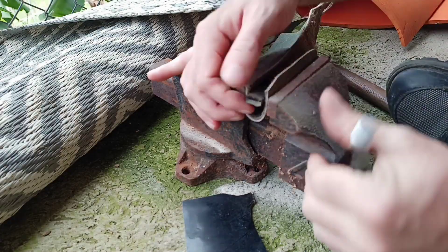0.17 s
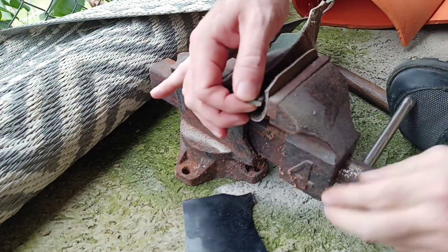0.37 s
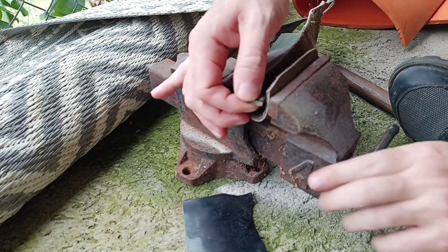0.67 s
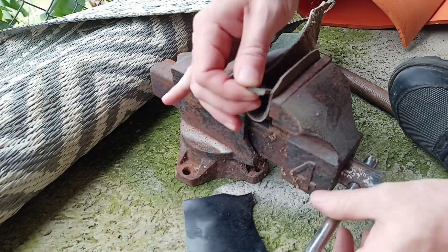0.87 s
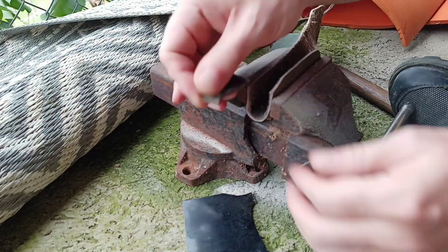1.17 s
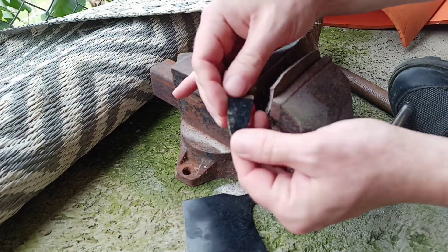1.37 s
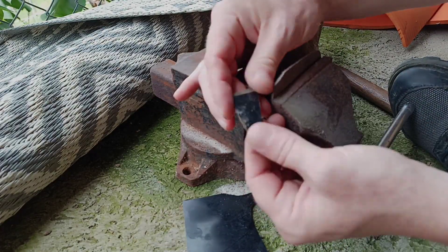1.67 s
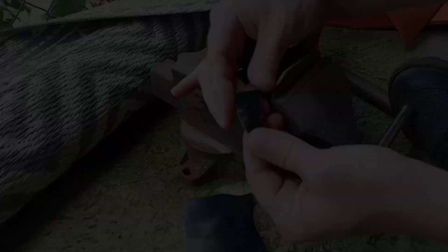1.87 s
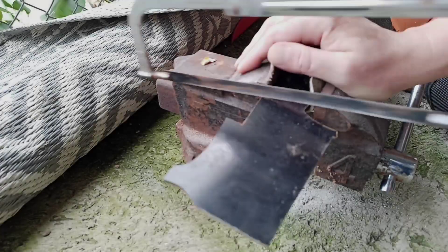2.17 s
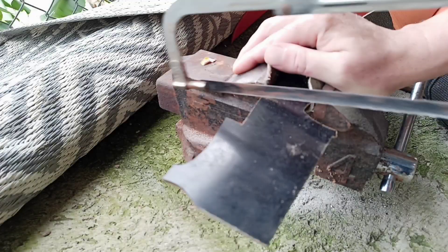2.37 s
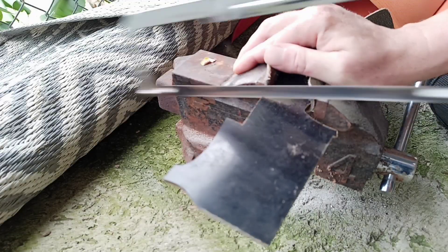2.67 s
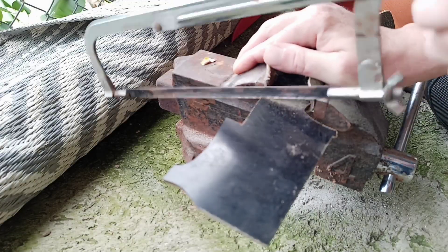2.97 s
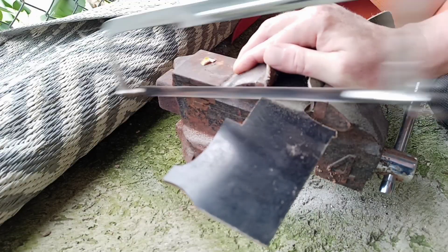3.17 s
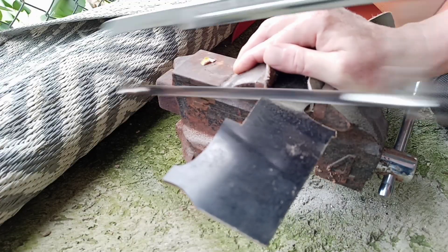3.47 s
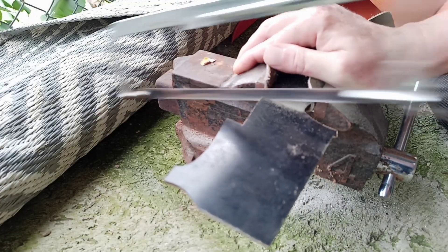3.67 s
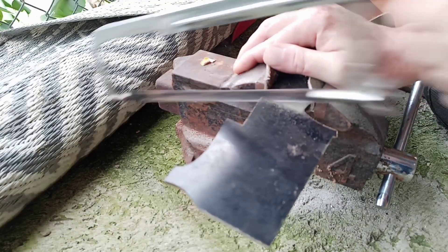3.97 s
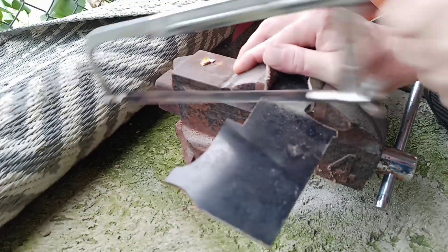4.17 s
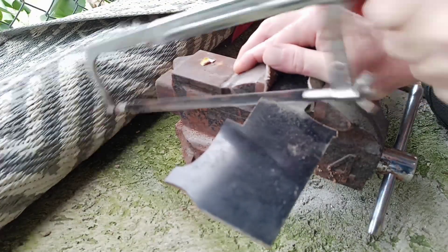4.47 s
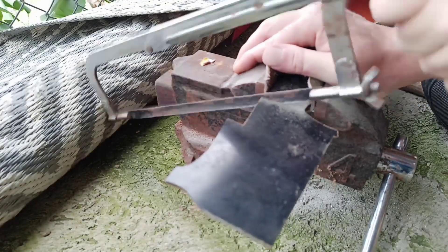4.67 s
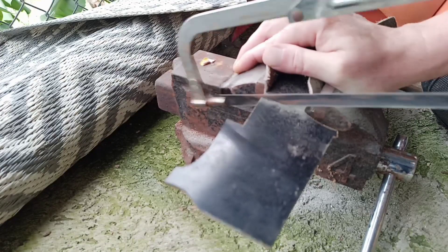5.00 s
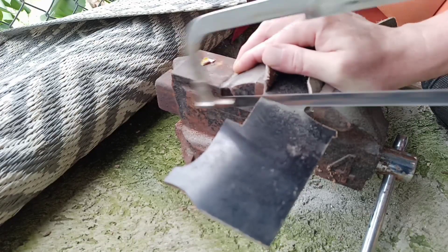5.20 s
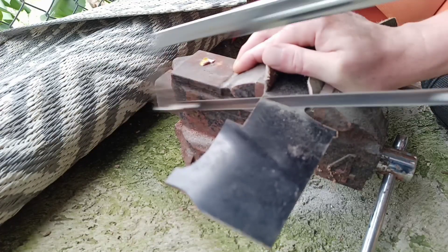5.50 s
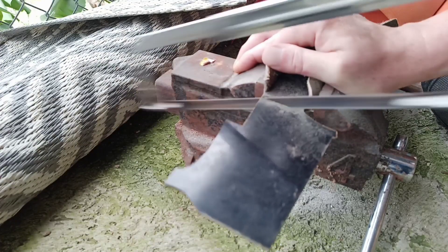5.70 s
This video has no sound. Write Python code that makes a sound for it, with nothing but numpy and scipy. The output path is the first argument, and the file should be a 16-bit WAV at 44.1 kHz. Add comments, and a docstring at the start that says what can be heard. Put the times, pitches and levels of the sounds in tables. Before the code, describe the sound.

First, sparse metal handling near the microphone: a sliding vise rod clicks, scrapes and knocks, loudest just after half a second, with a last softer clack at one second. Quiet outdoor air dips away. Then speeded-up hacksawing swells in and stays loud, a buzzing, gritty metallic rasp with fluttering strokes, fitful singing squeals and small vise thuds. Dry, no echo, single channel.

```python
"""Outdoors, close to a vise, over a faint low drone and quiet air: a hand spins and sets its sliding handle,
heard as bursts of coloured noise, ringing modes and low thuds; all that fades away.
Then a hacksaw fades in, racing through a clamped steel plate at about twenty strokes a second:
noisy tooth force rings the steel, gliding tones chirp when the teeth catch,
and short low pulses are the vise thumping where the saw turns round."""
import sys
import numpy as np
from scipy.fft import rfft, irfft, next_fast_len
from scipy.io import wavfile
from scipy.ndimage import uniform_filter1d, map_coordinates

SR = 44100
rng = np.random.default_rng(int(sys.argv[2]) if len(sys.argv) > 2 else 0)


def unload_audio(sound):
    """Save the sound as a 16-bit wav file, at the path given as the first command line argument."""
    columns = np.transpose(np.atleast_2d(sound))
    # keep every value between -1 and 1, then stretch to whole-number steps
    steps = np.round(np.clip(columns, -1, 1) * 32767)
    wavfile.write(sys.argv[1], SR, steps.astype(np.int16))


N = 257544
TIME = np.arange(N) / SR


def amp(db):
    """Decibels to gain."""
    return 10 ** (np.asarray(db) / 20)


def unit(x):
    """Scales a sound to rms 1."""
    return x / np.sqrt(np.mean(x ** 2) + 1e-20)


def over_time(points):
    """Reads (time, value) points along the whole take."""
    return np.interp(TIME, *np.transpose(points))


def along(points, hz):
    """Reads (Hz, value) points on a log frequency axis."""
    f, v = np.transpose(points)
    return np.interp(np.log(hz + 1), np.log(f + 1), v)


def wobble(rate):
    """A smooth random curve with this many knots a second."""
    knots = rng.standard_normal(int(N * rate / SR) + 4)
    return map_coordinates(knots, [TIME * rate])


def filtered(x, response):
    """Multiplies the spectrum of x by a response of frequency."""
    size = next_fast_len(len(x) + 4096)
    hz = np.fft.rfftfreq(size, 1 / SR)
    return irfft(rfft(x, size) * response(hz), size)[:len(x)]


def noise(response, size=N):
    """Coloured noise of rms 1."""
    return unit(filtered(rng.standard_normal(size), response))


def resonances(modes, hz):
    """Gain of a set of (Hz, half width Hz, dB) resonances with steep skirts."""
    power = 0
    for centre, width, db in modes:
        power = power + (amp(db) / (1 + ((hz - centre) / width) ** 2)) ** 2
    return np.sqrt(power)


def add(track, s, sound):
    """Mixes a sound into the track, centred on time s."""
    index = round(s * SR) - len(sound) // 2 + np.arange(len(sound))
    inside = (index >= 0) & (index < N)
    track[index[inside]] += sound[inside]


def around(size):
    """A short time axis in seconds, centred on zero."""
    return (np.arange(size) - size // 2) / SR


def thud(t, hz, length):
    """A few cycles of the heavy vise rocking, under a bell-shaped swell."""
    swell = np.exp(-.5 * (t / length) ** 2)
    return np.sqrt(2) * swell * np.sin(2 * np.pi * (hz * t + rng.random()))


# the wavering low drone: start_s, pitch_hz, level_db
DRONE_PATH = [(0, 77.3, -54), (.11, 77.4, -55), (.25, 67.2, -76), (.45, 68, -66), (.62, 65, -54),
              (.75, 54.7, -56), (.82, 54.6, -70), (1.13, 56, -65.5), (1.24, 56.8, -47.5),
              (1.38, 56.7, -55.5), (1.5, 56.2, -72.5), (1.9, 57.7, -101)]
# colour of the open air: freq_hz, level_db (relative)
AIR_COLOUR = [(25, -26.5), (70, -6.5), (130, -9.5), (205, -11), (260, -19), (420, -25), (1100, -31.5),
              (3000, -33), (6500, -36), (7800, -43.5), (9500, -42), (13000, -50)]
# loudness of the air at the microphone: start_s, level_db
AIR_LEVEL = [(0, -68), (1.4, -64), (1.65, -70.5), (1.85, -80), (1.95, -102), (2.05, -75.5), (2.4, -71)]


def outdoors():
    """The place itself: shaped noise for quiet air, and a sine of changing pitch and level for the drone."""
    s, hz, db = np.transpose(DRONE_PATH)
    phase = 2 * np.pi * np.cumsum(np.interp(TIME, s, hz)) / SR
    drone = np.sqrt(2) * amp(np.interp(TIME, s, db)) * np.sin(phase)
    air = noise(lambda hz: amp(along(AIR_COLOUR, hz)))
    return drone + air * amp(over_time(AIR_LEVEL))


# resonances of the vise body: pitch_hz, half_width_hz, level_db (relative)
VISE_MODES = [(1133, 15, -1), (1473, 48, -0.5), (1970, 56, -7.5), (2600, 49, -2), (3010, 70, -5),
              (3500, 25, -12.5), (3970, 120, -15.5), (4720, 55, -8.5), (6270, 55, -7.5), (6960, 74, -14.5)]


def clank(t, t60):
    """The vise's modes ring on after a contact, at new strengths each time, falling 60 dB in t60 seconds."""
    age = np.maximum(t, 0)
    ring = np.zeros(len(t))
    for hz, _, db in VISE_MODES:
        strength = amp(db + rng.normal(0, 3))
        ring += strength * np.sin(2 * np.pi * (hz * age + rng.random()))
    onset = 1 - np.exp(-age / .001)
    return ring * onset * amp(-60 * age / t60)


# the handle slides and hits its stops:
# centre_s, level_db (before trims), rise_s, fall_s, brightness_db per octave, rod_ring_db, thud_db
HANDLE_MOVES = [(0.0644, -40, 0.0014, 0.0031, -3.5, -80, -62), (0.327, -53.5, 0.0096, 0.029, -12, -59, -80),
                (.348, -34, 0.0083, 0.013, 1, -39.5, -55), (.441, -48, 0.0077, 0.013, 1, -72, -56),
                (0.584, -53.5, 0.011, 0.035, -3, -82, -73.5), (.602, -23.5, 0.0027, 0.0084, -1, -47.5, -52),
                (0.614, -30.5, 0.0017, 0.0063, -0.5, -47, -35), (.669, -56, .002, 0.0034, -3, -54, -85),
                (.695, -59, 0.012, 0.017, 3.5, -75, -72), (1.004, -59, 0.0083, 0.024, -9.5, -82.5, -77),
                (1.05, -50.5, 0.0072, 0.018, -12, -54, -60), (1.071, -42, 0.014, 0.012, 3, -46, -44.5)]
# broad colour of a scrape on the vise: freq_hz, level_db (relative)
VISE_COLOUR = [(130, -19), (310, -20.5), (450, -11), (800, -6), (1100, -0.5), (1900, -6.5), (3300, -10.5),
               (5000, -7.5), (7200, -9.5), (8100, -19), (9800, -10), (11000, -26.5), (15000, -30)]
# the handle rod's own ring: pitch_hz, half_width_hz, level_db (relative)
ROD_MODES = [(5140, 100, 6.5), (9960, 150, -6.5)]


def handle():
    """The rod scrapes through the spindle and knocks at its end, ringing itself and the vise."""
    track, t = np.zeros(N), around(size=8192)
    for s, db, rise, fall, tilt_db, ring_db, thud_db in HANDLE_MOVES:
        swell = np.exp(-np.abs(np.where(t < 0, t / rise, t / fall)) ** 1.52)

        def colour(hz):
            octaves = np.log2(np.clip(hz, 500, 9000) / 3000)
            broad = amp(along(VISE_COLOUR, hz) + tilt_db * octaves)
            return broad * (1 + amp(7.5) * resonances(VISE_MODES, hz))

        scrape = amp(db - 0.5) * swell * noise(colour, size=len(t))
        rod_ring = amp(ring_db) * swell * noise(lambda hz: resonances(ROD_MODES, hz), size=len(t))
        knock = amp(db - 13) * clank(t + rise / 2, t60=.012 + 5 * fall)
        low_thud = amp(thud_db) * thud(t, hz=135, length=0.0072)
        add(track, s, scrape + rod_ring + knock + low_thud)
    squeak = amp(-61) * np.exp(-(t / 0.0046) ** 2) * np.sin(2 * np.pi * 6520 * t)
    add(track, .157, squeak)  # one tiny squeak
    return track


# runs of evenly spaced strokes, push and pull in turn: start_s, strokes (count), first_turn_dip_db,
# later_turn_dip_db, plate_db (relative to the effort, before push/pull and scatter)
STROKE_RUNS = [(2.006, 1, -20, -19, 6.5), (2.072, 1, -49, -45, -5.5), (2.155, 3, -48, -12.5, -7),
               (2.319, 1, -27, -24, -11), (2.368, 4, -19.5, -5.5, -10.5), (2.576, 1, -28, -28, -19.5),
               (2.645, 3, -22, -6.5, -13.5), (2.805, 1, -16, -20, -10.5), (2.854, 3, -22.5, -7.5, -16.5),
               (3.018, 4, -19.5, -5.5, -17), (3.222, 4, -20, -13, -18.5), (3.431, 4, -9, -13.5, -17),
               (3.625, 5, -9, -6, -13), (3.875, 7, -22, -5.5, -17), (4.222, 3, -16.5, -14, -18.5),
               (4.366, 3, -15.5, -6, -16), (4.517, 4, -3.5, -7, -13), (4.71, 3, -17, -18.5, -23),
               (4.854, 4, -20.5, -8, -20), (5.039, 4, -14.5, -7, -20.5), (5.247, 3, -26, -15, -20.5),
               (5.387, 4, -10, -8, -19.5), (5.577, 3, -5, -3, -16.5), (5.73, 2, -15.5, -4, -22.5),
               (5.826, 1, -24, -21, -33)]
LAST_STROKE_S = .05


def turns():
    """Every turn of the saw: its time, the rasp's dip there and the plate's level in the stroke that follows."""
    ends = [run[0] for run in STROKE_RUNS[1:]] + [STROKE_RUNS[-1][0] + LAST_STROKE_S]
    rows = []
    for (start, strokes, first_db, later_db, plate_db), end in zip(STROKE_RUNS, ends):
        for k, s in enumerate(np.linspace(start, end, strokes, endpoint=False)):
            rows.append((s, later_db if k else first_db, plate_db))
    rows.append((end, later_db, plate_db))
    return np.transpose(rows)


# how hard the saw is driven, the reference for rasp, plate, jolts and lesser chirps: start_s, level_db
EFFORT = [(2.02, -60), (2.12, -46), (2.22, -41.5), (2.35, -27), (2.6, -22), (3.6, -21.5), (4.5, -21.5),
          (4.8, -21), (5.3, -20), (5.84, -21)]
PUSH_DB, PULL_PLATE_DB = 0.36, 2.5  # the teeth cut on the push; the plate rings more on the pull
RASP_SCATTER_DB, PLATE_SCATTER_DB = .5, 2.47  # from stroke to stroke
PUSH_CREST, PULL_CREST = .45, .47  # moment of full speed, as a share of the stroke


def stroke_motion(peakedness=2.1, usual_s=0.056):
    """Saw speed (0-1), rasp amplitude and plate level: each stroke speeds up and stops again."""
    start, dip_db, plate_db = turns()
    place = np.interp(TIME, start, np.arange(len(start)))
    k = np.minimum(place.astype(int), len(start) - 2)  # which stroke
    u = place % 1  # share of the stroke done
    push = np.where(k % 2, -1, 1)
    crest = np.where(push > 0, PUSH_CREST, PULL_CREST)
    speed = np.abs(np.sin(np.pi / 2 * np.where(u < crest, u / crest, (1 - u) / (1 - crest))))
    # long strokes hold their force
    bite = speed ** (peakedness * np.minimum(1, usual_s / np.diff(start)[k]) ** 2)
    bite = np.tanh(1.024 * bite) / np.tanh(1.15)  # the teeth can only dig in so far
    effort = amp(over_time(EFFORT)) * np.clip((TIME - start[0]) / .005, 0, 1)
    rasp_luck, plate_luck = rng.standard_normal((len(start), 2))[k].T
    at_turn = amp(np.interp(TIME, start, dip_db))
    at_speed = amp(PUSH_DB * push + RASP_SCATTER_DB * rasp_luck)
    rasp = at_turn * (1 - bite) + at_speed * bite
    plate = amp(plate_db[k] - PULL_PLATE_DB * push + PLATE_SCATTER_DB * plate_luck)
    return speed, effort * rasp, effort * uniform_filter1d(plate, size=600)


def teeth(grit_db, grit_rate, snag_db, snag_rate):
    """Force of teeth tearing off chips: a gritty rush with single harder snags."""
    rush = unit(rng.standard_normal(N) * amp(grit_db * wobble(grit_rate)))
    snags = (rng.random(N) < snag_rate / SR) * rng.standard_normal(N)
    return rush + amp(snag_db) * unit(snags)


# how far the saw has sunk in: start_s, depth (0 shallow, 1 medium, 2 deep)
CUT_DEPTH = [(2.9, 0.15), (3.7, 0.63), (4.6, 1.7), (4.8, 2.43)]


def steel(force, modes, bend, wander_db, drift):
    """The force rings the steel; modes bend in pitch and trade strength as contact moves and the cut deepens."""
    depth = over_time(CUT_DEPTH)
    shares = np.maximum(0, 1 - np.abs(depth - np.arange(3)[:, None]))  # of shallow, medium, deep
    size = next_fast_len(N + 4096)
    hz, spectrum = np.fft.rfftfreq(size, 1 / SR), rfft(force, size)
    sound, power = np.zeros(N), np.zeros(N)
    for centre, width, *db in modes:
        delay = rng.random() * 0.001194  # each mode is reached by its own path
        response = np.exp(-2j * np.pi * hz * delay) / (1 + 1j * (hz - centre) / width) ** 2
        analytic = np.fft.ifft(spectrum * response, size)[:N]  # one-sided, so its pitch can be shifted
        shift_hz = min(centre, 4000) * (bend + drift * wobble(40))
        ring = np.real(analytic * np.exp(2j * np.pi * np.cumsum(shift_hz) / SR))
        gain = amp(db) @ shares
        sound += gain * amp(wander_db * wobble(45)) * unit(ring) * np.sqrt(width)
        power += gain ** 2 * width
    return sound / np.sqrt(power)


# the blade's singing pitch in a shallow, medium and deep cut: pitch_hz
WHISTLE_PITCH = [3416, 3570, 3563]


def whistle(speed, arch=.1, unsteady=.033, fitful_db=8.0, overtone_db=-6):
    """The blade sings fitfully while it runs fast; its pitch arches with the speed of each stroke."""
    hz = np.interp(over_time(CUT_DEPTH), np.arange(3), WHISTLE_PITCH)
    pitch = hz * (1 + arch * (speed - 1) + unsteady * wobble(28))
    phase = 2 * np.pi * np.cumsum(pitch) / SR + .17 * wobble(450)
    tone = np.sin(phase) + amp(overtone_db) * np.sin(2 * phase)
    return unit(tone * speed * amp(fitful_db * np.tanh(wobble(22))))


# resonances of plate, blade and frame: pitch_hz, half_width_hz,
# shallow_db, medium_db, deep_db (relative levels by depth of cut)
STEEL_MODES = [(355.6, 22.3, -22, -17.5, -12.5), (715, 124, -19, -18.5, -19.5), (935, 67, -1, -41, -17),
               (1097, 62.4, -6.5, 1, -3), (1461, 210, -16.5, -14.5, -15), (1807, 44, -4.5, -9, -12.5),
               (2010, 100, -4, -6.5, -9), (2318, 105, -6, -4, -9), (2820, 250, -16, -11, -6),
               (2867, 44, -10, -8.5, -4.5), (3406, 58, -1.5, -0.5, -6), (3652, 233, -17.5, -2.0, -3.5),
               (4360, 340, -12, -7, -10), (5108, 58, -5, -6, -9), (5430, 232, -7.5, -10, -4),
               (6080, 250, -7.5, -1, -11.5), (6720, 350, -22, -11, -11.5), (7380, 126, -8.5, -14, -13.5),
               (7640, 174, -7, -10.5, -13.5), (8670, 350, -15.5, -16, -20.5), (9800, 700, -17, -15, -15),
               (10800, 170, -20.5, -19, -21.5), (11300, 4500, -24.5, -26.5, -26.5),
               (15100, 1800, -22.5, -24.5, -26.5)]


def saw():
    """The bright rasp and the plate's note follow the stroke; the lowest modes judder where the saw slows."""
    speed, rasp, plate = stroke_motion()
    force = teeth(grit_db=1.5, grit_rate=900, snag_db=-13.5, snag_rate=220)
    jolts = teeth(grit_db=4.5, grit_rate=90, snag_db=-8, snag_rate=60)
    low_hz, high_hz = 850, 1600
    high_modes = [m for m in STEEL_MODES if m[0] > high_hz]
    note_modes = [m for m in STEEL_MODES if low_hz < m[0] <= high_hz]
    low_modes = [m for m in STEEL_MODES if m[0] <= low_hz]
    bend = .05 * (speed - .8)  # the teeth press harder at speed and stiffen the contact
    bright = steel(force, high_modes, bend, wander_db=3.0, drift=.014)
    note = steel(force, note_modes, bend, wander_db=3.0, drift=0.01475)
    judder = steel(jolts, low_modes, bend, wander_db=4.0, drift=0.0103)
    singing = amp(-11) * whistle(speed)

    def lately(level):  # mean over a few strokes
        return np.abs(uniform_filter1d(level, size=9000)) + 1e-9

    contact = (rasp / lately(rasp)) ** 0.65  # drops wherever the saw stops dead
    slowing = 1 - 0.86 * speed ** 2
    sound = rasp * (amp(-0.57) * bright + singing)
    sound += amp(-2.0) * plate * contact * note
    sound += amp(-5.0) * lately(plate) * contact ** 0.63 * slowing * judder
    dips = [(8170, 170, -8.0), (525, 101, -5.0)]  # antiresonances: Hz, half width Hz, cancelled part dB

    def body(hz):
        low_cut = 1 / np.sqrt(1 + (290 / (hz + 1)) ** 14)
        return (1 - resonances(dips, hz)) * low_cut

    return filtered(sound, body)


# the hardest jolts of the vise on the ground: centre_s, level_db (before a common trim)
HARD_THUMPS = [(2.244, -42.5), (2.568, -43), (2.805, -38), (2.9, -42), (3.013, -37), (3.131, -38),
               (3.426, -35.5), (3.73, -43), (4.13, -43), (4.808, -45), (5.645, -42), (5.775, -39.5)]
# ordinary jolts at each turn, relative to the effort and before the same trim
ROCK_PUSH_DB, ROCK_PULL_DB, ROCK_SCATTER_DB, ROCK_LAG_S = -28.5, -39, 2, .002


def rocking():
    """The vise thumps at each turn, most before a push, over a low unsteady shudder of filtered noise."""
    track, t = np.zeros(N), around(size=4096)
    jolts = []
    for k, s in enumerate(turns()[0]):
        effort_db = np.interp(s, *np.transpose(EFFORT))
        turn_db = ROCK_PULL_DB if k % 2 else ROCK_PUSH_DB
        jolts.append((s + ROCK_LAG_S, effort_db + turn_db + ROCK_SCATTER_DB * rng.standard_normal()))
    for s, db in HARD_THUMPS + jolts:
        hz = 142 * np.exp(0.067 * rng.standard_normal())
        add(track, s, thud(t, hz, length=0.0067) * amp(db - 3.0))
    shudder = noise(lambda hz: resonances([(129, 57, 0)], hz)) * amp(1.8 * wobble(35))
    fade_in = np.clip((TIME - 2.1) / 0.33, 0, 1)
    return track + shudder * amp(-61.5) * fade_in


def catches(blade_share=.15, plate_share=.5, blade_db=-1.0, plate_db=-11, blade_hz=2880, plate_hz=1175,
            detune=0.029, glide_hz=-3000, length_s=0.0051):
    """Lesser chirps in mid-stroke, by chance: the blade catches on the push, the plate on the pull."""
    start = turns()[0]
    rows = []
    for k, (s, end) in enumerate(zip(start, start[1:])):
        chance, moment, pitch = rng.random(), rng.uniform(.3, .7), rng.standard_normal()
        on_push, on_pull = (blade_share, blade_db, blade_hz), (plate_share, plate_db, plate_hz)
        share, db, hz = on_pull if k % 2 else on_push
        if chance < share:
            level_db = db + np.interp(s, *np.transpose(EFFORT))
            rows.append((s + moment * (end - s), level_db, hz * (1 + detune * pitch), glide_hz, length_s))
    return rows


# the loudest stick-slip chirps of plate and blade:
# centre_s, level_db (before trim and tremor), pitch_hz, glide_hz per s, half_length_s
LOUD_CHIRPS = [(2.413, -24.5, 1117, -13000, .0046), (2.748, -25.5, 1057, 1000, 0.0054),
               (2.882, -22, 960, 7000, 0.0059), (3.248, -19, 3410, 0, 0.0058),
               (3.285, -24, 980, 2000, 0.0072), (3.458, -15, 3480, -17000, 0.0064),
               (3.757, -11, 3370, -8000, 0.0025), (3.759, -22, 1104, -4000, .0071),
               (3.856, -21, 3660, -6000, 0.009), (4.051, -17, 3390, 13000, 0.0031),
               (4.067, -19.5, 2900, 4, 0.0047), (4.151, -15.5, 3730, -11000, 0.0071),
               (4.258, -19, 3780, -3000, .0052), (4.335, -14, 3650, 7000, .0032),
               (4.505, -23.5, 1108, -5000, 0.0064), (4.547, -19, 3594, -13000, .0084),
               (4.684, -20, 3570, -15000, .0042), (4.736, -20.5, 5390, -13000, 0.0062),
               (5.174, -22.5, 1085, -5000, 0.0058), (5.317, -21.5, 4300, 2000, 0.0053),
               (5.498, -18.5, 3700, 32000, 0.0032), (5.506, -15.5, 5220, 22000, 0.0046)]


def chirps(rough=0.13, overtone_db=-17, level_db=-1):
    """For a moment the teeth lock onto a mode, whose pitch glides with the blade."""
    track, t = np.zeros(N), around(size=3072)
    flutter, tremor = wobble(430), wobble(300)
    for s, db, hz, glide, length in LOUD_CHIRPS + catches():
        span = np.arange(round(s * SR) - len(t), round(s * SR)) % N  # a stretch of the random curves
        phase = 2 * np.pi * (hz * t + glide * t ** 2 / 2) + rough * flutter[span]
        swell = amp(db + level_db + 0.46 * tremor[span]) * np.exp(-.5 * (t / length) ** 2)
        tone = np.sin(phase) + amp(overtone_db) * np.sin(2 * phase)
        add(track, s, np.sqrt(2) * swell * tone)
    return track


def scene():
    """Everything is close to the microphone and dry, on one channel."""
    mix = outdoors() + handle() + saw() + rocking() + chirps()
    return mix[None]


def record(dry):
    """The recorder rolls off steeply at its band limit."""
    top_hz, slope_hz = 15800, 350

    def roll_off(hz):
        return np.sin(np.pi / 2 * np.clip((top_hz - hz) / slope_hz, 0, 1)) ** 2

    return np.array([filtered(channel, roll_off) for channel in dry])


dry = scene()
out = record(dry)
unload_audio(out)
```